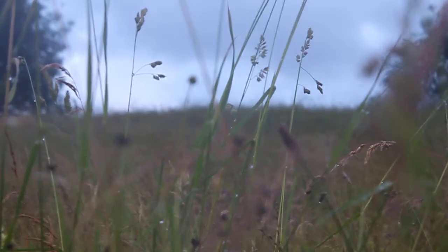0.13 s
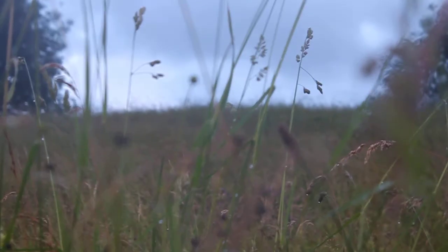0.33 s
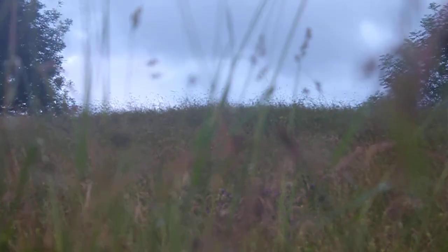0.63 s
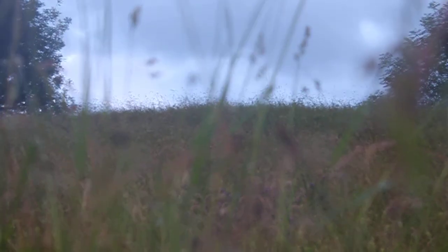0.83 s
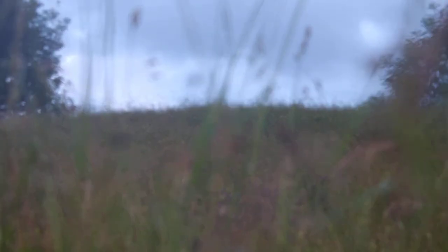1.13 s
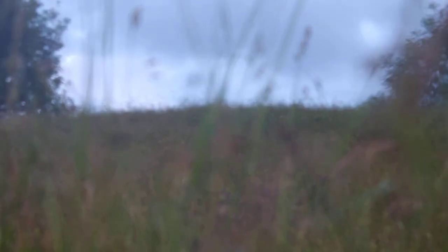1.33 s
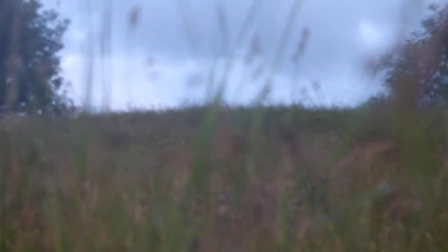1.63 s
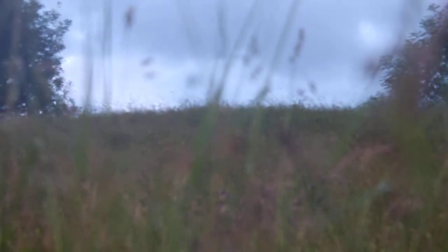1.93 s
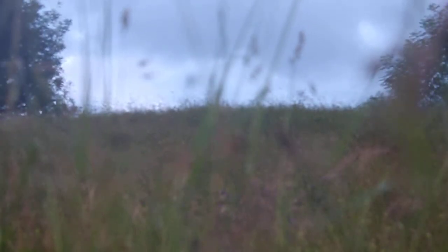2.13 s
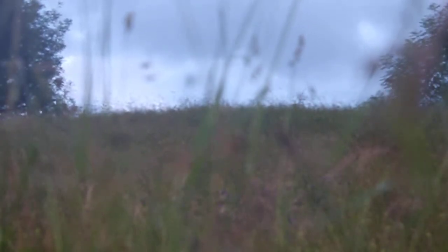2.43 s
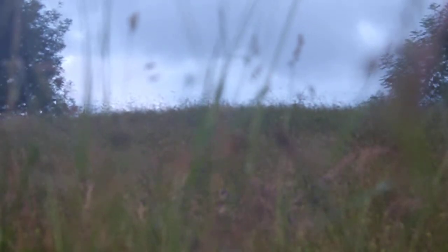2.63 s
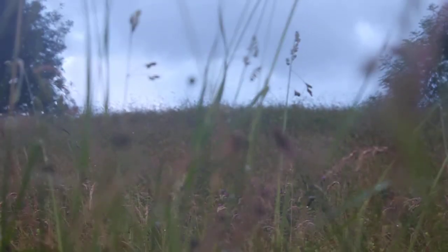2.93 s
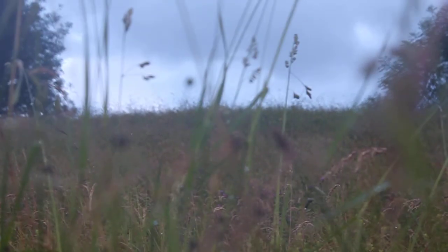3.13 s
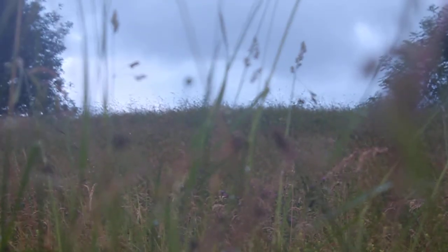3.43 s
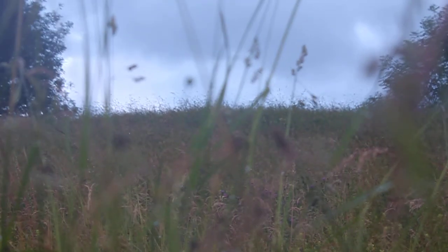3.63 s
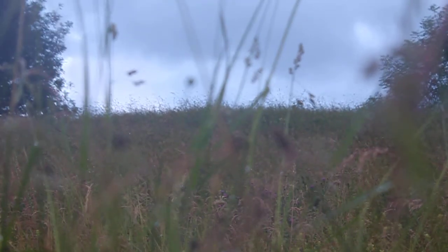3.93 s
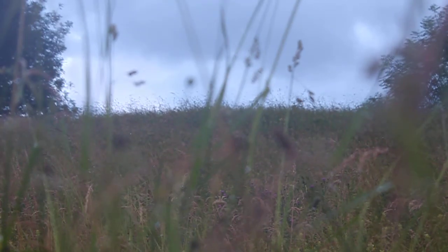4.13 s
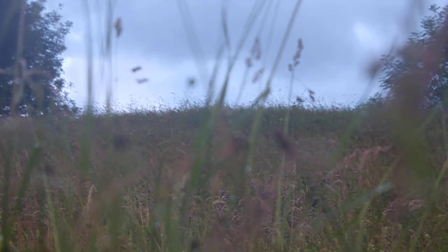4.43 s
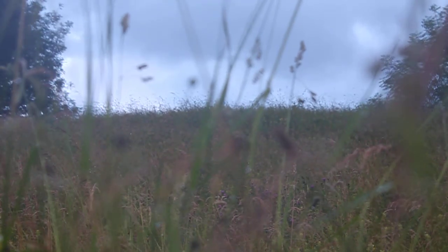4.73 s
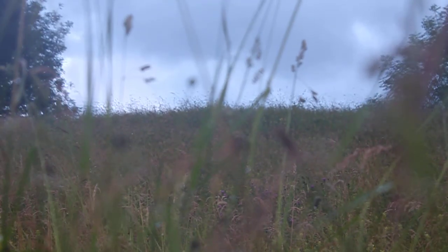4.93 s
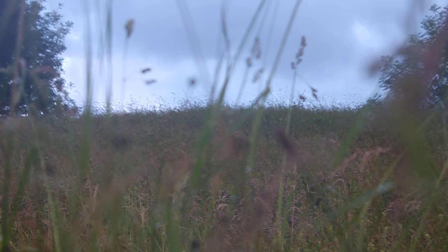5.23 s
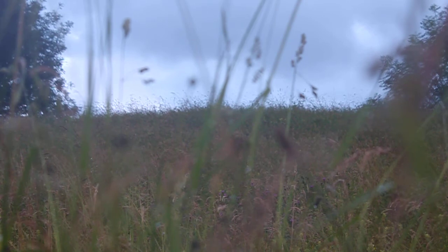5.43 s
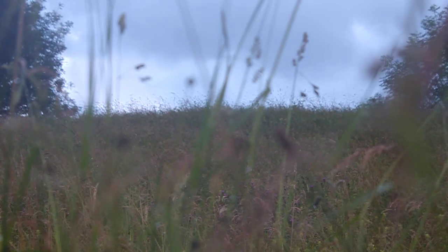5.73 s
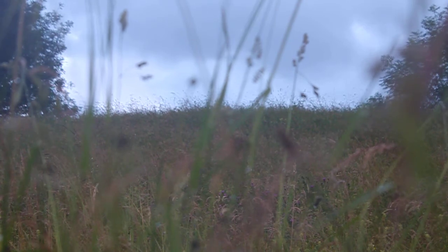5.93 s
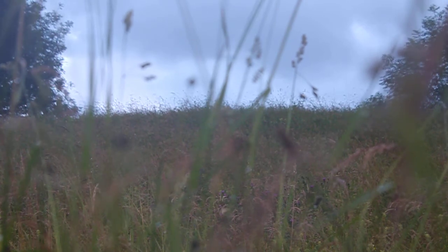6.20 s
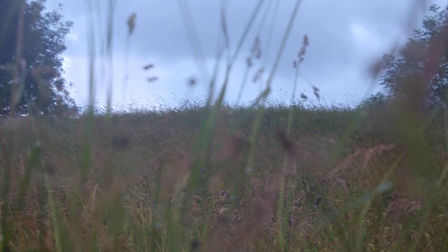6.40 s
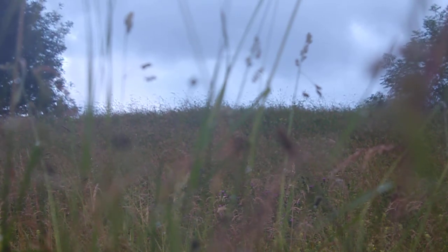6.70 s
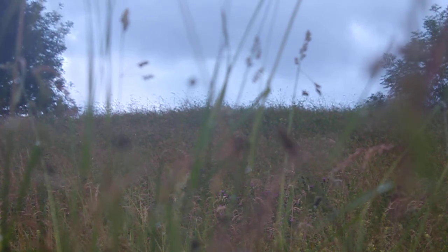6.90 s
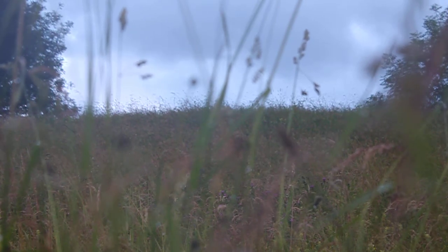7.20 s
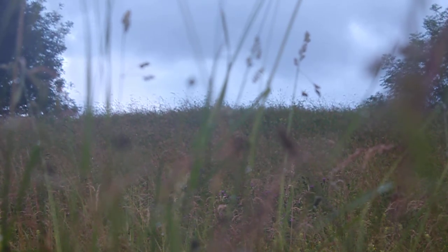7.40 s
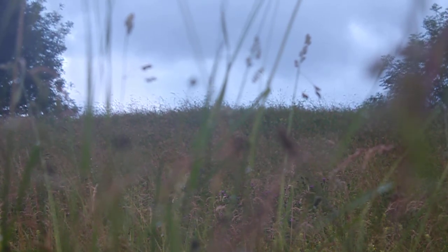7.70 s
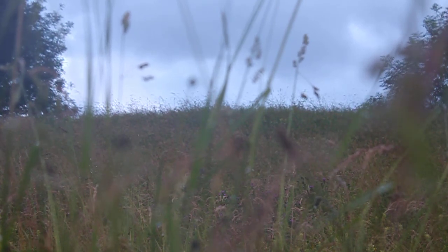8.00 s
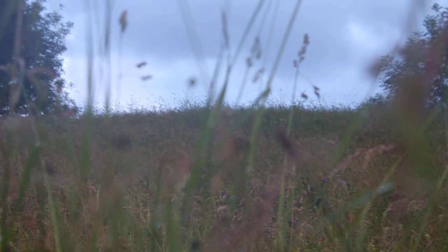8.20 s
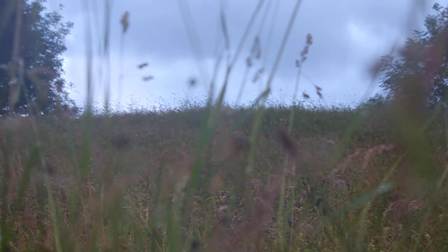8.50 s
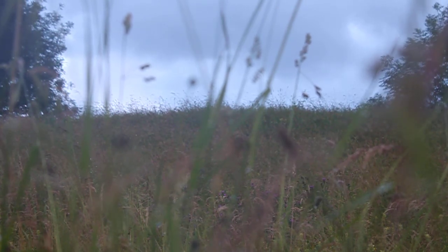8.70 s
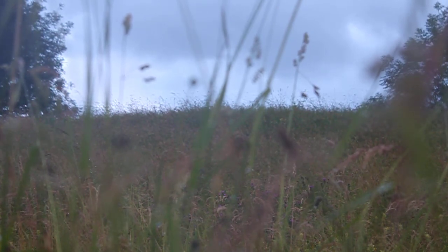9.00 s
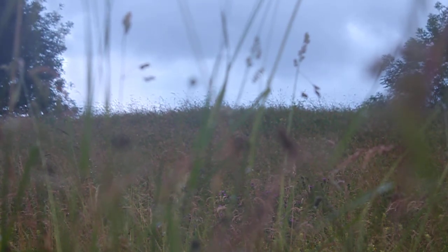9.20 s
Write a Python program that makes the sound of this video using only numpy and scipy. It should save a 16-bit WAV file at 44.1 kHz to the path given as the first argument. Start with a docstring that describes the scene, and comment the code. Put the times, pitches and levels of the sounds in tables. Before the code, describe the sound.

Light rain in an open meadow, heard from a microphone low among the grass. Low wind rumbles under a soft, steady hiss, with countless faint ticks all around. Brief rustles and soft bumps come early, then sharper drops slap nearby blades, busiest after the middle. Near the end one heavy drop smacks the microphone housing and distorts.

```python
"""Low wind and the hiss of light rain on a meadow, heard among the grass; a rustle, then near drops slap.
Wind is noise in shifting bands; hiss is filtered noise that brightens as the rain gets heavier.
Each drop is a one-cycle slap, a noise burst of spray, a faint scatter and a treble fizz.
Rustles are grainy noise swells; late on, one heavy drop smacks the microphone housing and overloads it."""
import sys
import numpy as np
from scipy import signal
from scipy.fft import rfft, irfft
from scipy.io import wavfile
from scipy.ndimage import uniform_filter1d

SR = 44100
rng = np.random.default_rng(int(sys.argv[2]) if len(sys.argv) > 2 else 0)


def to_wav(s):
    """Save 16-bit WAV."""
    ch = np.atleast_2d(s).T  # columns
    pcm = np.round(np.clip(ch, -1, 1) * 32767)  # PCM
    wavfile.write(sys.argv[1], SR, pcm.astype(np.int16))


N = 412335
T = np.arange(N) / SR


def undb(db):
    """Decibels to gain."""
    return 10 ** (np.asarray(db) / 20)


def curve(rows):
    """Rows of seconds and value, joined by straight lines."""
    return np.interp(T, *np.transpose(rows))


def unit(x):
    """Scale to rms 1."""
    return x / np.sqrt(np.mean(x ** 2) + 1e-18)


def add(out, start_s, x):
    """Mix x into out from start_s."""
    i = int(np.clip(start_s * SR, 0, N - 1))
    out[i:i + len(x)] += x[:N - i]


def colour(x, points, size=8192):
    """Minimum-phase filter through the given points of Hz and dB."""
    hz, db = np.transpose(points)
    log_hz = np.log(np.fft.rfftfreq(size, 1 / SR) + 1)
    log_gain = np.log(undb(np.interp(log_hz, np.log(hz), db)))
    # fold the cepstrum to make the filter causal
    cepstrum = irfft(log_gain)
    cepstrum[1:size // 2] *= 2
    cepstrum[size // 2 + 1:] = 0
    impulse = irfft(np.exp(rfft(cepstrum)))
    return signal.fftconvolve(x, impulse)[:N]


def ring(x, hz, q):
    """One resonance, gain 1 at its centre."""
    w = 2 * np.pi * min(hz / SR, .45)
    a = np.sin(w) / (2 * q)
    return signal.lfilter([a, 0, -a], [1 + a, -2 * np.cos(w), 1 - a], x)


def walk(rate_hz):
    """Random levels held for 1 / rate_hz and smoothed twice; rms 1."""
    k = int(SR / rate_hz)
    held = np.repeat(rng.standard_normal(N // k + 1), k)
    return unit(uniform_filter1d(uniform_filter1d(held, k), k)[:N])


def mode(hz, t60_s):
    """A struck mode: a sine that falls 60 dB in t60_s, cut at 0.2 s."""
    t = T[:SR // 5]
    return np.sin(2 * np.pi * hz * t) * np.exp(-np.log(1000) * t / t60_s)


# Strength of the wind before flutter. Each row: time in seconds, level in dB.
WIND_DB = [(0, -33), (.3, -33.5), (.55, -30), (1.1, -31), (1.3, -34), (2, -35), (2.4, -33.5), (2.8, -34.5),
           (3.85, -31.5), (4.9, -31.5), (5.6, -31.5), (6.5, -35), (7.1, -34.5), (8, -31.5), (8.6, -28.5),
           (9.35, -30.5)]
# Pitch of the strongest eddies. Each row: time in seconds, pitch in Hz.
EDDY_HZ = [(0, 126), (2.4, 135), (3.6, 128), (6.2, 137), (7.1, 117.4), (8, 102.5), (9.35, 108.6)]
# Colour of the wind before the bands shift. Each row: frequency in Hz, density in dB per Hz.
WIND_COLOUR = [(13, -33), (22, -36), (65, -4), (119, 0.5), (196, -6.5), (269, -11.5), (365, -21),
               (600, -31.5), (780, -72), (1320, -120)]
GUST_DB, GUSTS_PER_S = 1.0, 9  # flutter about the slow course


def wind(hump_db=8.0, hump_octaves=0.38, tilt_db=6.0):
    """Low eddies in third-octave bands; the strongest size shifts as the air moves and tilts the others."""
    centre = np.log2(curve(EDDY_HZ))
    shift = centre - centre.mean()
    spectrum = rfft(colour(rng.standard_normal(N), WIND_COLOUR))
    bin_hz = np.clip(np.fft.rfftfreq(N, 1 / SR), 40, 320)  # the outer bands take the rest
    band = np.round(3 * np.log2(bin_hz)) / 3
    air = 0
    for octave in np.unique(band):
        hump = np.exp(-((octave - centre) / hump_octaves) ** 2)
        tilt = shift * (octave - centre.mean())
        band_db = hump_db * (hump - hump.mean()) + tilt_db * tilt
        air = air + irfft(spectrum * (band == octave), N) * undb(band_db)
    steady = air / np.sqrt(uniform_filter1d(air ** 2, SR // 5))
    return steady * undb(curve(WIND_DB) + GUST_DB * walk(GUSTS_PER_S))


# Strength of the distant rain; hiss and patter scale its swells. Each row: time in seconds, strength in dB.
RAIN_DB = [(0, -46.5), (.7, -44.5), (1.4, -44.5), (1.9, -47), (2.6, -45), (3, -44.5), (3.5, -45.5),
           (4.3, -44.5), (5, -44), (5.5, -42), (6.2, -47), (6.6, -47.5), (7, -48), (7.5, -44.5),
           (7.9, -44.5), (8.5, -42.5), (8.85, -44), (9.35, -40.5)]
# Colour of the hiss before its treble swells. Each row: frequency in Hz, density in dB per Hz.
HISS_COLOUR = [(190, -28), (330, -3), (500, -6), (800, -4.5), (1400, -4), (1900, -5.5), (3000, -7),
               (4200, -9), (6200, -11), (8000, -13.5), (10000, -22.5), (13000, -29.5), (16000, -38)]


def hiss(rain_db, over_db=0.93, flicker_db=0.5, split_hz=3500, low_follows=0.15, treble_follows=1.2):
    """Rain on the whole field, too dense to tell the drops apart; it brightens as it gets heavier."""
    field = unit(colour(rng.standard_normal(N), HISS_COLOUR))
    low = signal.sosfiltfilt(signal.butter(2, split_hz, fs=SR, output="sos"), field)
    treble = field - low
    swell_db = rain_db - rain_db.mean()
    sound = low * undb(low_follows * swell_db) + treble * undb(treble_follows * swell_db)
    return sound * undb(rain_db.mean() + over_db + flicker_db * walk(10))


FIZZ_HZ, FIZZ_Q = 8560, 1.3  # where the finest droplets sizzle


def drop(noise, hz, spray, fizz_db, tail_db, slap_q=1.46, spray_q=2.65, spray_s=0.0022, tail_s=0.0069,
         leaf_gain=0.47, leaf_s=0.00052, body_hz=7500):
    """A slap of about one cycle, a burst of spray and a faint scatter through the stems; rms 1 over 1 ms."""
    t = T[:len(noise)]
    spray = np.clip(spray, 0, 1)
    slap = unit(ring(1. * (t == 0), hz, slap_q))
    burst = unit(ring(noise * np.exp(-(t / spray_s) ** 2), hz, spray_q))
    scatter = unit(ring(noise[::-1] * np.exp(-t / tail_s), hz, slap_q))
    x = np.sqrt(1 - spray) * slap + np.sqrt(spray) * burst + undb(tail_db) * scatter
    # a reflection off nearby leaves, its delay random from drop to drop
    delay_s = leaf_s * np.exp(.5 * noise[-3])
    x = x + leaf_gain * np.interp(t - delay_s, t, x, left=0)
    # the finest droplets carry the treble
    body = signal.lfilter([1, .5], [1, -np.exp(-2 * np.pi * body_hz / SR)], x)
    fizz = ring(ring(x, FIZZ_HZ, FIZZ_Q), FIZZ_HZ, FIZZ_Q)
    mixed = unit(unit(body) + undb(fizz_db) * unit(fizz))
    return mixed * np.sqrt(.001 / t[-1])


# Colour that wet grass gives every drop. Each row: frequency in Hz, gain in dB.
WET_GRASS = [(100, -16), (500, -3.5), (850, 3), (1400, 3.5), (1850, -1), (2300, -1), (3400, -1),
             (5000, 1.5), (8300, -1.5), (10500, -9.5), (13500, -5.5), (16000, -3)]


def patter(rain_db, count=1800, size=400, base_db=-43.0, spread_db=4.0, most_db=-32, rain_follows=0.26,
           centre_hz=2400, octaves=0.58, fizz_db=-15, fizz_spread_db=6, tail_db=-24):
    """Drops all around, most of them dry ticks: the farther off, the more of them and the fainter."""
    out = np.zeros(N)
    swell_db = rain_db - rain_db.mean()
    for (when, far, wet), noise in zip(rng.random((count, 3)), rng.standard_normal((count, size))):
        db = min(base_db - spread_db * np.log(far), most_db) + rain_follows * swell_db[int(when * N)]
        hz = centre_hz * 2 ** (octaves * noise[-1])
        this_fizz_db = fizz_db + fizz_spread_db * noise[-2]
        add(out, when * N / SR, undb(db) * drop(noise, hz, .5 * wet ** 2, this_fizz_db, tail_db))
    return colour(out, WET_GRASS)


# Waves of drops on the stems, before grass colour.
# Each row: time in seconds, typical level in dB rms over 1 ms.
SHOWER_DB = [(0, -30), (1.2, -23.5), (1.9, -37), (3, -24.5), (4.2, -32), (5.2, -25.5), (6.1, -30.5),
             (6.8, -25.5), (7.7, -30), (8.3, -28.5), (9.35, -29.5)]


def stem_drops(count=150, size=600, spread_db=2.5, centre_hz=2400, octaves=0.37, most_spray=.6,
               fizz_db=-15, fizz_spread_db=6, tail_db=-26):
    """Single ticks a step or two away, some sixteen a second, most of them dry, each with its own pitch."""
    out, shower_db = np.zeros(N), curve(SHOWER_DB)
    draws = zip(rng.random((count, 3)), rng.standard_normal((count, size)))
    for k, ((when, strength, wet), noise) in enumerate(draws):
        start_s = (k + 2 * when) % count / count * N / SR  # jittered even spacing
        db = shower_db[int(start_s * SR)] + spread_db * (2 * strength - 1)
        hz = centre_hz * 2 ** (octaves * noise[-1])
        this_fizz_db = fizz_db + fizz_spread_db * noise[-2]
        add(out, start_s, undb(db) * drop(noise, hz, most_spray * wet ** 2, this_fizz_db, tail_db))
    return colour(out, WET_GRASS)


# Rustling swells. Each row: peak time in seconds, level in dB, rise in seconds, fall in seconds.
RUSTLES = [(.02, -34.5, 0.08, 0.053), (.14, -41, 0.026, 0.022), (.505, -29, 0.025, 0.035),
           (0.556, -30, 0.039, 0.042), (.905, -34.5, 0.056, 0.036), (1.628, -31, 0.0063, 0.0057),
           (2.861, -21.5, 0.027, 0.035), (4.94, -43.5, 0.011, 0.014)]
# Colour of the rustling. Each row: frequency in Hz, density in dB per Hz.
RUSTLE_COLOUR = [(300, -48), (600, -14.5), (850, -12.5), (1150, -1), (1450, -1), (1800, -8.5), (2300, 0),
                 (2800, -4), (3450, -0.5), (5000, -10.5), (7500, -16.5), (9500, -24), (10800, -22.5),
                 (15000, -56)]
# Blades flicking water off. Each row: peak time in seconds, spatter level in dB, length in seconds,
# spatter pitch in Hz, stem knock in dB, knock pitch in Hz.
FLICKS = [(1.6287, -16, 0.0029, 4430, -26.5, 705), (3.377, -24, 0.0061, 4500, -24, 940),
          (3.395, -27.5, 0.00413, 1500, -29, 890)]
FLICK_TOP_HZ = 7840  # the spatter dulls above this


def rustles(grain_db=2.0, catch_db=1.5, flick_q=0.87, stem_t60_s=0.05):
    """Wet surfaces sliding past each other: grainy swells that catch and slip, and quick flicks of a blade."""
    swell = np.zeros(N)
    for peak_s, db, rise_s, fall_s in RUSTLES:
        away = (T - peak_s) / np.where(T < peak_s, rise_s, fall_s)
        swell += undb(db) * np.exp(.5 - np.hypot(.5, away))
    grain = rng.standard_normal(N) * undb(grain_db * walk(900) + catch_db * walk(110))
    out = swell * unit(colour(grain, RUSTLE_COLOUR))
    dull = signal.butter(2, FLICK_TOP_HZ, fs=SR, output="sos")
    spatter = signal.sosfilt(dull, rng.standard_normal(N))
    for peak_s, db, length_s, hz, stem_db, stem_hz in FLICKS:
        burst = np.exp(-((T - peak_s) / length_s) ** 2)
        out += undb(db) * burst * unit(ring(spatter, hz, flick_q))
        add(out, peak_s - length_s, undb(stem_db) * mode(stem_hz, stem_t60_s))
    return out


# Colour of the smack, before peak scaling. Each row: frequency in Hz, relative gain in dB.
SMACK_COLOUR = [(60, -16), (200, -3), (400, -5), (630, 0), (950, 6), (1350, 3.5), (1800, -17), (2600, -2),
                (4500, -20), (7000, -14), (14000, -32)]
# Modes of the shuddering shell. Each row: pitch in Hz, level in dB, 60 dB decay in seconds.
SHELL = [(430, -4, 0.014), (620, 5.5, 0.0085), (940, -4, 0.0092), (1300, -1.5, 0.0057), (1600, -6.5, 0.013)]
# Soft low bumps. Each row: start in seconds, level in dB, pitch in Hz.
BUMPS = [(.575, -14.5, 176), (0.738, -21, 189), (0.899, -16.5, 270), (1.124, -21, 169), (1.142, -12, 159),
         (3.125, -23, 380), (4.94, -22, 305), (8.738, -9, 183), (8.7586, -13.5, 195)]
KNOCK_S, KNOCK_PEAK_DB = 8.7331, 6
SHELL_LAG_S = .0008  # the shell gives way just after the smack
SPLASH_S = 0.0015  # decay to 1/e


def housing(bump_t60_s=0.048, splash_db=-9, splash_hz=3000, splash_q=0.76):
    """One heavy drop smacks and splashes on the microphone's housing, which shudders; light touches bump it."""
    out = np.zeros(N)
    smack = colour(1. * (T == 0), SMACK_COLOUR)
    smack = undb(KNOCK_PEAK_DB) * smack / np.abs(smack).max()
    splash = unit(ring(rng.standard_normal(N), splash_hz, splash_q)) * np.exp(-T / SPLASH_S)
    add(out, KNOCK_S, smack + undb(splash_db) * splash)
    for hz, db, t60_s in SHELL:
        add(out, KNOCK_S + SHELL_LAG_S, undb(db) * mode(hz, t60_s))
    for start_s, db, hz in BUMPS:
        add(out, start_s, undb(db) * mode(hz, bump_t60_s))
    return out


# Near drops, before grass colour. Each row: start in seconds, level in dB rms over 1 ms, slap pitch in Hz,
# share of spray from 0 to 1, fizz of fine droplets in dB relative to the body.
NEAR_DROPS = [(0.2553, -16, 3220, 0.99, -2), (.278, -21.5, 2720, 0.7, -6), (0.4142, -21, 2710, 0, -12),
              (.826, -21, 2600, 0.2, -14), (.9889, -23.5, 3010, 0.1, -13), (1.157, -22, 1080, 0.9, -27),
              (1.1851, -24.5, 2200, 0.23, -23), (1.2704, -25, 4220, .2, -15),
              (1.3194, -23.5, 2580, 0.6, -11), (1.8156, -20.5, 2280, 0.25, -19),
              (2.2106, -21, 2690, 0, -18), (2.291, -21, 3320, 0.8, -13), (2.4792, -20.5, 3320, .45, -1.5),
              (2.6448, -14.5, 2800, 0.5, -6), (2.9454, -16, 3190, 0.97, -6), (2.9679, -16, 2070, 0.36, -23),
              (3.1231, -17.5, 3570, 0.75, -8), (3.1798, -23.5, 2240, 0, -9), (3.5578, -23, 2350, 0.2, -19),
              (3.641, -24, 3010, 0, -21), (3.9629, -20.5, 2140, 0.97, -9), (4.0526, -22.5, 2850, 0.4, -26),
              (4.1726, -22, 3770, 0.7, -1), (4.2768, -24, 2780, .5, -16), (4.4928, -22, 2570, 0.13, -14),
              (4.681, -16.5, 2120, 0.98, -4), (4.7482, -23, 2220, 0, -13), (4.7895, -23, 3300, .7, -5),
              (4.86, -21.5, 2830, 0.6, -16), (4.8723, -21, 2870, .3, -11), (5.2243, -22.5, 2240, 0.02, -21),
              (5.4262, -19.5, 2620, 0.3, -11), (5.61, -21, 1270, 0.14, -25), (5.7385, -4, 2430, .1, -19),
              (5.7739, -17, 2580, .7, -14), (5.8127, -25, 2580, 0.1, -26), (5.8234, -21.5, 2490, 1, -23),
              (5.8715, -20.5, 3380, 0, -19), (5.8878, -19, 2540, 0.5, -4.5), (5.9615, -22.5, 2460, 0, -13),
              (6.0351, -14.5, 2420, 0.08, -7), (6.0964, -19, 2260, 0.6, -12), (6.133, -21.5, 3190, .1, -3),
              (6.2485, -19, 2500, 0.8, -7), (6.2687, -13, 3140, 0.03, -.5), (6.397, -17, 1900, 0, -10),
              (6.4755, -22.5, 3830, 0.2, -4), (6.482, -13.5, 5800, 0.94, -12), (6.7127, -22, 3300, 0, -22),
              (6.8048, -21.5, 2600, 0.03, -17), (6.8809, -13, 2040, 0.1, -28), (7.218, -16, 2730, 0.07, -3),
              (7.402, -20, 2580, 0, -6), (7.492, -23, 2580, 0.9, -4), (7.504, -23, 3100, 0, -21),
              (7.6677, -11.5, 2450, .1, -7), (8.2694, -27, 2240, 0, -27), (8.6866, -19.5, 3060, 0.15, -30),
              (9.255, -27.5, 3940, .15, -6)]


def near_drops(size=900, tail_db=-24):
    """Drops within arm's reach slap and spatter on wet blades, each with its own pitch, spray and fizz."""
    out = np.zeros(N)
    noises = rng.standard_normal((len(NEAR_DROPS), size))
    for (start_s, db, hz, spray, fizz_db), noise in zip(NEAR_DROPS, noises):
        add(out, start_s, undb(db) * drop(noise, hz, spray, fizz_db, tail_db))
    return colour(out, WET_GRASS)


def scene():
    """Wind, rain far and near, rustles and knocks summed at one microphone."""
    rain_db = curve(RAIN_DB)
    background = wind() + hiss(rain_db) + patter(rain_db)
    close = stem_drops() + rustles() + housing() + near_drops()
    return (background + close)[None]


# Resonances of the cavity in front of the microphone.
# Each row: frequency in Hz, width in Hz, level in dB relative to the direct sound.
CAVITY = [(1300, 590, -18.5), (2240, 71, -14), (3290, 25, -19), (3530, 64, -12)]
CLIP_LEVEL, TOP_HZ = .72, 16100  # clip level before the low-pass, full scale 1


def record(dry):
    """The microphone's cavity colours the sound, the input clips on the hardest hits and the top is cut."""
    coloured = dry + sum(undb(db) * ring(dry, hz, hz / width_hz) for hz, width_hz, db in CAVITY)
    clipped = np.clip(coloured, -CLIP_LEVEL, CLIP_LEVEL)
    return signal.sosfilt(signal.ellip(8, .2, 70, TOP_HZ, fs=SR, output="sos"), clipped)


dry = scene()
out = record(dry)
to_wav(out)
```